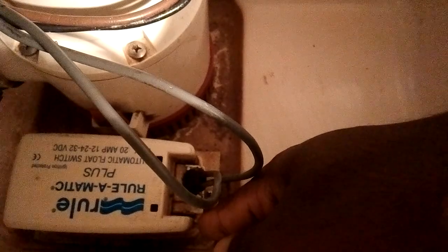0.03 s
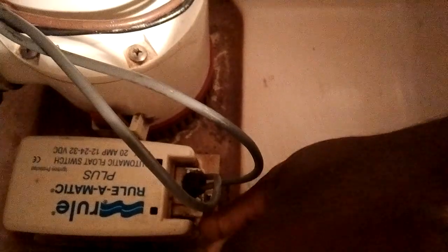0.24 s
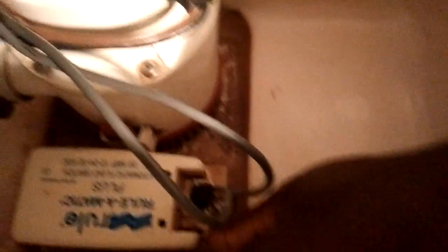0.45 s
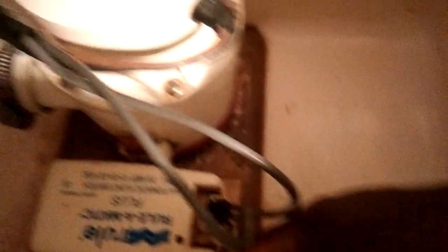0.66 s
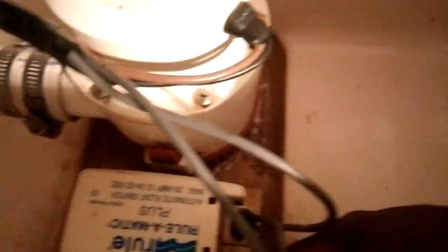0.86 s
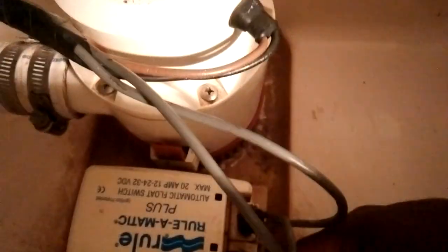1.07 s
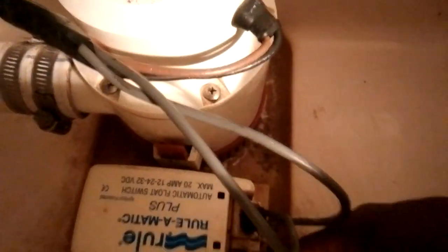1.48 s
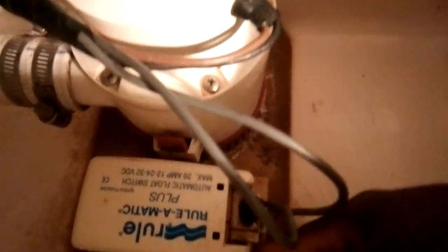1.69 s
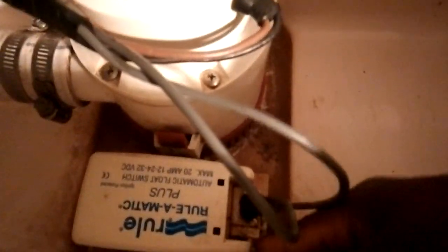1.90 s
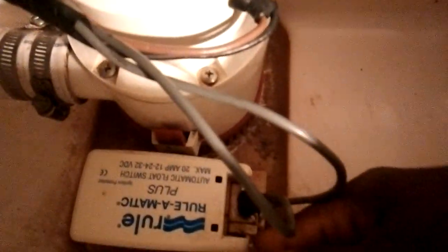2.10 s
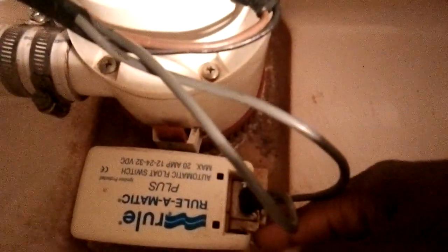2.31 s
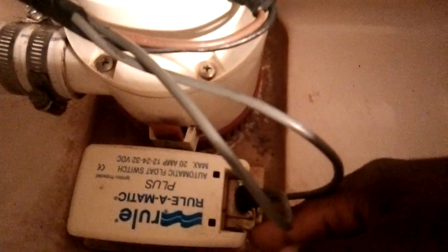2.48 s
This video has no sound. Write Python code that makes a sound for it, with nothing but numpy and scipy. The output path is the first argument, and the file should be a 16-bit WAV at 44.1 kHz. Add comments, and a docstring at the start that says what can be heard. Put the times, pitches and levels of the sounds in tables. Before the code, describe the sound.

Close up, a small electric pump whirrs in a boat's bilge. A switch clicks twice, the motor spins up and hums with a slight rattle, then another click cuts it and its whine falls away.

```python
"""A faint rustle and two sharp clicks: a finger lifts the float switch of a small bilge pump, close by.
The motor growls, spins up and runs dry in its fibreglass well, humming at harmonics of the shaft speed
while its brushes hiss, its bearings rattle and its impeller ticks. The switch snaps open and the rotor
coasts down, its cogging sweeping through the housing's resonances. A low drone lies underneath."""
import sys
import numpy as np
from scipy import signal
from scipy.fft import rfft, irfft
from scipy.io import wavfile
from scipy.ndimage import uniform_filter1d, minimum_filter1d

SR = 44100
rng = np.random.default_rng(int(sys.argv[2]) if len(sys.argv) > 2 else 0)


def dump(signal):
    """Clip the signal to [-1, 1] and save it as 16-bit WAV at the path in sys.argv[1]."""
    limited = np.clip(np.atleast_2d(signal).T, -1, 1)
    pcm = np.round(limited * 32767).astype(np.int16)
    wavfile.write(sys.argv[1], SR, pcm)


N = 116865
T = np.arange(N) / SR
POWER_ON_S, POWER_OFF_S = 0.228, 1.866
BRUSH_EXPONENT = 1.81   # hiss and tick amplitudes go with this power of speed

# Background tones. Each row: frequency in Hz, rms level in dB.
DRONE_TONES = [(99.5, -41.5), (166.5, -47), (187, -52), (802, -69.5), (14605, -71)]
# Noise spectra. Each row: frequency in Hz, relative level in dB.
AIR_SPECTRUM = [(25, -2), (60, -2), (110, -18), (200, 11), (300, -1.5), (800, -26), (1500, -22.5),
                (4000, -30.5), (6500, -16), (10000, -23), (12000, -32), (16000, -23)]
FINGER_SPECTRUM = [(300, -43), (700, -1), (1050, 0.5), (1600, -9), (2400, -8.5), (4000, -15.5), (6500, -15),
                   (10000, -26), (12000, -24)]
CONTACT_SPECTRUM = [(100, -41), (450, 13), (700, -57), (1200, 7), (2500, -2), (4000, 2), (6300, 8.5),
                    (8000, 2), (10000, -7.5), (13000, -16), (15000, -1), (16500, -24)]
CASE_SPECTRUM = [(100, -54), (550, -33), (950, 6), (1130, -1), (1330, 1), (1650, -21.5), (2250, -5.5),
                 (3000, -15.5), (9000, -48)]
SHUDDER_SPECTRUM = [(20, 8), (45, -4), (80, 4), (200, 5), (260, 0.5), (330, 0), (450, -3.5), (600, -5.5),
                    (900, -41)]
# Switch snaps. Each row: start in seconds, level in dB, the contacts' 60 dB decay time in seconds,
# case knock relative to the contacts in dB, left minus right in dB.
SWITCH_SNAPS = [(0.1605, -14, 0.025, -6, 9), (.2184, -17, 0.02, 7, 7), (1.8703, -14, 0.021, -4, 6)]
# Rotation of the shaft. Each row: time in seconds, speed in turns per second.
SHAFT_SPEED = [(.158, 1.13), (.170, 37.5), (.207, 38.4), (.222, 41), (.246, 71.2), (.33, 72.5), (.5, 73.2),
               (1.872, 73.12), (1.96, 60.4), (2.04, 47.8), (2.09, 43.6), (2.14, 36.8), (2.21, 29.8),
               (2.27, 23.2), (2.33, 17.3), (2.40, 11.5), (2.6, 0.62)]
# Seal friction. Each row: centre in Hz, width in Hz, level at full speed in dB, left minus right in dB.
SEAL_BANDS = [(1420, 280, -52.5, 4), (1738, 200, -45, 3.5), (2050, 230, -53.5, -9), (2646, 540, -49, 6),
              (3338, 160, -52.5, 14.5)]
# Brush hiss. Each row: frequency in Hz, relative level on the left in dB, the same on the right in dB.
BRUSH_SPECTRUM = [(30, -12, -2), (260, 4.5, -17), (620, -17, -13.5), (1220, -8, -18), (1570, -5.5, -19.5),
                  (2130, -6, -17.5), (3050, -8, -12), (4200, -7.5, -11.5), (4710, -12, -17),
                  (5230, 1, -10.5), (5600, -2.5, -18), (6290, 5, 0.5), (5950, -2.5, -25.5),
                  (6840, 4.5, -10), (6460, -9.5, -12), (8150, -11, -14.5), (10000, -14.5, -14.5),
                  (10410, -13.5, -15), (11150, -32, -31), (13800, -32, -35), (14300, -19.5, -22),
                  (15600, -19, -37), (16500, -45, -50)]
# Housing resonances. Each row: frequency in Hz, width in Hz, gain for cogging in dB,
# rattle level at full speed in dB, left minus right in dB.
HOUSING_MODES = [(101, 7.4, -23, -50.5, 6), (120.6, 11.7, -0.5, -49, 1.5), (164.8, 9, 5, -38.5, -1),
                 (185.7, 14.6, -43, -38.5, 2), (218.3, 21, -24, -42, -5), (368, 23, -19.5, -62.5, 19),
                 (445.5, 34, -17.5, -51, 12.5), (520, 42, -22, -46.5, 14), (722, 23, -6, -36, 7.5),
                 (773.3, 18.4, -0.5, -35, 0.5), (878.4, 88, -10, -41.5, -5), (1016.4, 23, -9, -48.5, 2.5),
                 (1406, 79, -1, -47.5, -6.5), (1983, 190, -17, -50.5, 5), (2223, 79, 18, -57, 12)]
# Magnetic tug. Each row: multiple of shaft speed, relative level in dB, dB added per halving of speed.
COGGING_HARMONICS = [(2, -13, -5), (4, -28, 8), (5, -47, 14.5), (10, -18, -2.5), (12, -41, 10),
                     (20, -24, 1.5), (30, -34.5, 7), (40, -52.5, 11.5), (50, -51, -5)]
# Strength of the cogging while coasting. Each row: time in seconds, gain in dB.
COGGING_ENVELOPE = [(1.87, -7.5), (1.895, 2), (2.02, 6.5), (2.09, -5.5), (2.14, 5), (2.21, -6), (2.28, -5),
                    (2.38, -9.5), (2.42, -28), (2.52, -14), (2.6, -76)]
# Tone colour of the coasting whine, strongest in the low mids. Each row: frequency in Hz, gain in dB.
COGGING_COLOUR = [(30, -22), (75, -23), (100, -5.5), (135, -2.5), (170, 2.5), (260, -10), (400, -1),
                  (560, 2.5), (720, 1.5), (900, 4), (1000, -1), (1070, -13), (1280, -13), (1370, -11),
                  (1500, -18), (1800, -13), (2000, 2.5), (2260, -24), (2600, -21)]
# Starting growl. Each row: multiple of shaft speed, peak level in dB.
GROWL_HARMONICS = [(4, -31.5), (20, -11.5), (24, -28.5), (38, -38), (60, -32)]
# Hum under power. Each row: multiple of shaft speed, base peak level in dB, left minus right in dB.
HUM_HARMONICS = [(1, -46.5, 1), (2, -20, 2.5), (3, -37.5, -6), (5, -39.5, -0.5), (6, -31.5, 1.5),
                 (7, -39.5, -6.5), (8, -53.5, 22), (9, -41, 12), (10, -27.5, 2.5), (11, -40.5, 4),
                 (12, -26, 1), (13, -52, 11), (14, -40, 0), (15, -51.5, 3), (16, -59, -22), (17, -75, 1),
                 (18, -42.5, 3.5), (19, -36.5, 0), (20, -53, -23), (21, -52, -14), (22, -39.5, 0),
                 (23, -66, 3), (24, -48, 9), (25, -46.5, 7), (26, -73, -2), (27, -46.5, 11.5), (28, -45, 2),
                 (30, -47.5, 13), (32, -69, 8), (35, -44.5, -3)]
# Swell of the slot whine with the inrush current. Each row: time in seconds, gain in dB.
INRUSH_SWELL = [(.24, 11.5), (.28, 22.5), (.32, 19.5), (.37, 1.5)]
# Interaural phase of the hum. Each row: frequency in Hz, lead of the left ear in radians.
LEFT_EAR_LEAD = [(150, 0), (290, 1), (340, 2.5), (445, 3), (510, 1.03), (660, 2), (730, 1.9), (880, 0.44),
                 (1400, 2.5), (2500, 1.56)]


def from_db(db):
    """Amplitude grows tenfold every 20 dB."""
    return 10 ** (np.asarray(db) / 20)


def unit_rms(x):
    """Normalisation to an rms of 1."""
    return x / np.sqrt(np.mean(x ** 2) + 1e-20)


def curve(rows):
    """Linear interpolation in time between (seconds, value) rows."""
    return np.interp(T, *np.transpose(rows))


def gate(on_s, off_s, rise_s, fall_s):
    """A trapezoidal envelope, rising from on_s and falling from off_s."""
    return np.clip((T - on_s) / rise_s, 0, 1) * np.clip(1 - (T - off_s) / fall_s, 0, 1)


def pan(db):
    """An interaural level difference, split evenly into left and right gains."""
    return from_db(np.array([[.5], [-.5]]) * db)


def drift(rate_hz):
    """Low-passed noise gives a random wander of rms 1."""
    hz = np.fft.rfftfreq(N, 1 / SR)
    return unit_rms(irfft(rfft(rng.standard_normal(N)) / (1 + (hz / rate_hz) ** 2), N))


def colour(x, spectrum):
    """Spectral shaping by (Hz, dB) rows, joined along a logarithmic frequency axis."""
    hz, db = np.transpose(spectrum)
    bins_hz = np.fft.rfftfreq(N, 1 / SR)
    return irfft(rfft(x) * from_db(np.interp(np.log(bins_hz + 1), np.log(hz), db)), N)


def stereo_noise(correlation):
    """White noise whose shared part sets the correlation between the ears."""
    shared = np.sqrt(correlation) * rng.standard_normal(N)
    return shared + np.sqrt(1 - correlation) * rng.standard_normal((2, N))


def shaped_noise(spectrum, correlation):
    """Filtered stereo noise of rms 1."""
    return unit_rms(colour(stereo_noise(correlation), spectrum))


def resonate(x, hz, width_hz):
    """A damped two-pole resonator with a peak gain of 1."""
    r = np.exp(-np.pi * width_hz / SR)
    feedback = [1, -2 * r * np.cos(2 * np.pi * hz / SR), r * r]
    return signal.lfilter(np.array([1, 0, -1]) * (1 - r * r) / 2, feedback, x)


def noise_band(hz, width_hz, correlation=0.53):
    """Two resonators in cascade cut a steep band of stereo noise, rms 1."""
    return unit_rms(resonate(resonate(stereo_noise(correlation), hz, width_hz), hz, width_hz))


def background():
    """Random amplitude and phase modulation make a low drone waver over faint air noise."""
    drone = 0
    for hz, db in DRONE_TONES:
        amplitude = from_db(db) * np.sqrt(2) * (1 + 0.05 * drift(9.7))
        drone += amplitude * np.sin(2 * np.pi * hz * T + 0.32 * drift(12))
    air = from_db(-51.5) * shaped_noise(AIR_SPECTRUM, correlation=0.3)
    return pan(1.6) * (drone + air)


def finger_rustle(peak_s=0.11, spread_s=0.084):
    """Friction of the finger lifting the float gives a faint swell of noise."""
    swell = np.exp(-((T - peak_s) / spread_s) ** 2)
    return from_db(-49.5) * swell * shaped_noise(FINGER_SPECTRUM, correlation=0.4)


def float_switch(chatter_s=0.0052, knock_t60_s=0.065, well_t60_s=0.17):
    """Impact: the contacts chatter and the plastic case knocks; both decay as the well reverberates."""
    out = 0
    for start_s, db, t60_s, knock_db, side_db in SWITCH_SNAPS:
        age = np.maximum(T - start_s - chatter_s, 0)   # full strength until the chatter ends
        well_tail = from_db(-23.5 - 60 * age / well_t60_s)
        crack = shaped_noise(CONTACT_SPECTRUM, 0.18) * (from_db(-60 * age / t60_s) + well_tail)
        knock = shaped_noise(CASE_SPECTRUM, 0.85) * from_db(knock_db - 60 * age / knock_t60_s)
        out += (T >= start_s) * from_db(db) * pan(side_db) * (crack + knock)
    return out


def shaft_seal(pace, rasp_s=0.297, spread_s=0.035):
    """Sliding friction in the seal grows with speed; the shaft rasps briefly during the inrush."""
    rub = sum(from_db(db) * pan(side_db) * noise_band(hz, width) for hz, width, db, side_db in SEAL_BANDS)
    swell = np.exp(-((T - rasp_s) / spread_s) ** 2)
    rasp = from_db(-25.5) * swell * noise_band(hz=1420, width_hz=390)
    return rub * pace ** 0.95 + pan(3.8) * rasp


def impeller_ticks(pace, ticks_per_s=42, decay_s=0.0037):
    """The dry impeller ticks as a Poisson process, each burst exciting one broad resonance."""
    impulses = (rng.random(N) < ticks_per_s / SR) * rng.uniform(0.069, 1, N)
    envelope = signal.lfilter([1], [1, -np.exp(-1 / (decay_s * SR))], impulses + 1e-18)
    ticks = resonate(envelope * stereo_noise(0.17), hz=3650, width_hz=760)
    return from_db(-43.5) * pan(5.2) * unit_rms(ticks) * pace ** BRUSH_EXPONENT


def brushes(angle, pace, build_up_s=0.25):
    """Sliding contact makes a gritty hiss that builds up and is amplitude-modulated once a turn."""
    grit = stereo_noise(0.13) * (1 + 0.2 * np.cos(angle))
    grit *= from_db(0.5 * drift(1200) + 1.5 * drift(19))   # fast sparking, slower sway
    hz, left_db, right_db = np.transpose(BRUSH_SPECTRUM)
    hiss = np.array([colour(ear, np.c_[hz, db]) for ear, db in zip(grit, (left_db, right_db))])
    build_up = from_db(-10 * np.exp(-T / build_up_s))
    return from_db(-29.5) * unit_rms(hiss) * pace ** BRUSH_EXPONENT * build_up


def bearing_rattle(pace):
    """Random excitation: play in the bearings shakes the housing's modes in proportion to speed."""
    out = 0
    for hz, width, _, db, side_db in HOUSING_MODES:
        shake = noise_band(hz, 1.17 * width, correlation=np.exp(-hz / 1800))
        out += from_db(db) * pan(side_db) * shake
    return out * pace


def coasting_shudder(pace, attack_s=0.052):
    """Forced vibration: the slowing pump shudders on its base and keeps two housing modes ringing."""
    shudder = from_db(-33.5) * pace ** 0.84 * shaped_noise(SHUDDER_SPECTRUM, correlation=0.55)
    modes = sum(noise_band(hz, width) for hz, width, *_ in HOUSING_MODES if 700 < hz < 800)
    ring = from_db(-36) * pace * modes
    onset = np.clip((T - POWER_OFF_S) / attack_s, 0, 1)
    return pan(2) * onset * (shudder + ring)


def cogging(angle, pace):
    """Resonance: magnets tug at the coasting rotor, and each falling harmonic rings the modes it meets."""
    halvings = -np.log2(np.maximum(pace, .15))
    tug = 0
    for multiple, db, slope_db in COGGING_HARMONICS:
        roughness = 1 + .3 * drift(40)
        tug += from_db(db + slope_db * halvings) * roughness * np.sin(multiple * angle)
    envelope = (T > POWER_OFF_S) * from_db(curve(COGGING_ENVELOPE))
    whine = colour(envelope * tug, COGGING_COLOUR)
    return sum(from_db(db) * pan(side_db) * resonate(whine, hz, width)
               for hz, width, db, _, side_db in HOUSING_MODES)


def motor_growl(angle):
    """A starting transient: the first, brief contact kicks the rotor into rough shaft harmonics."""
    contact = gate(on_s=.167, off_s=0.204, rise_s=.012, fall_s=0.013)
    harmonics = sum(from_db(db) * (1 + 0.34 * drift(59)) * np.sin(multiple * angle)
                    for multiple, db in GROWL_HARMONICS)
    return contact * pan(5.5) * harmonics


def motor_hum(angle, rotor_slots=10):
    """Periodic magnetic forces sound shaft harmonics while current flows; inrush swells the slot whine."""
    top_speed = curve(SHAFT_SPEED).max()
    out = 0
    for multiple, db, side_db in HUM_HARMONICS:
        lead = np.interp(multiple * top_speed, *np.transpose(LEFT_EAR_LEAD))
        swell = from_db(curve(INRUSH_SWELL)) if multiple == rotor_slots else 1
        # The bass and the whine of the twelfth harmonic are steadier than the rest.
        flutter_depth = 0.067 if multiple <= 2 else .05 if multiple == 12 else 0.18
        amplitude = from_db(db) * (swell + flutter_depth * drift(22))
        phase = multiple * angle + lead * np.array([[.5], [-.5]]) + rng.uniform(0, 2 * np.pi)
        out += amplitude * pan(side_db) * np.sin(phase)
    return gate(POWER_ON_S, POWER_OFF_S, rise_s=.035, fall_s=0.022) * out


def scene():
    """Superposition: background, switch and pump add, with one shaft speed driving the pump's sounds."""
    speed = curve(SHAFT_SPEED)
    pace = speed / speed.max()   # fraction of full speed
    wobble = 1 + .0012 * drift(14)
    angle = 2 * np.pi * np.cumsum(speed * wobble) / SR   # shaft angle in radians
    pump = motor_hum(angle) + motor_growl(angle) + cogging(angle, pace) + coasting_shudder(pace)
    pump += bearing_rattle(pace) + brushes(angle, pace) + impeller_ticks(pace) + shaft_seal(pace)
    return pump + finger_rustle() + float_switch() + background()


def record(dry, limit_db=-4, lookahead_s=0.01, release_db_per_s=296, stopband_hz=17000):
    """Look-ahead limiting lowers the gain around peaks; a steep low-pass removes the highest treble."""
    ahead = int(lookahead_s * SR)
    peak_db = 20 * np.log10(np.abs(dry).max(axis=0) + 1e-9)
    excess_db = np.maximum(peak_db - limit_db, 0)
    release_db = release_db_per_s * T
    reduction_db = np.maximum.accumulate(excess_db + release_db) - release_db
    gain_db = uniform_filter1d(minimum_filter1d(-reduction_db, 2 * ahead), ahead)
    low_pass = signal.cheby2(14, 70, stopband_hz, fs=SR, output="sos")
    return signal.sosfilt(low_pass, dry * from_db(gain_db))


dry = scene()
out = record(dry)
dump(out)
```